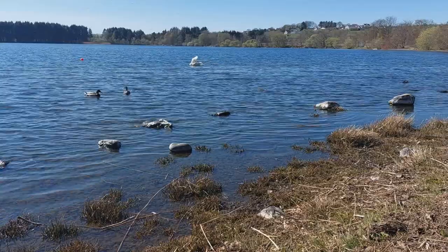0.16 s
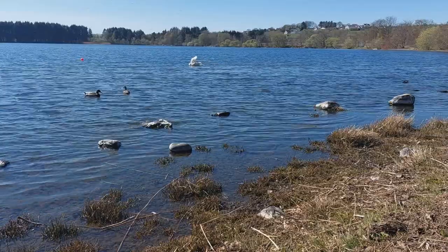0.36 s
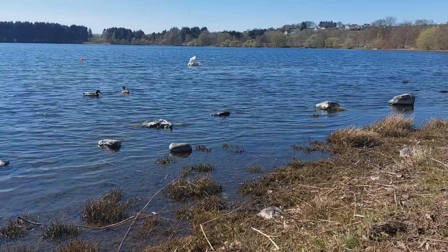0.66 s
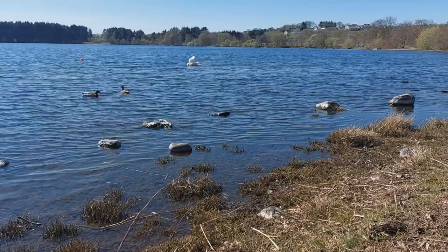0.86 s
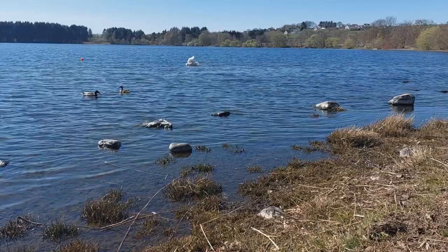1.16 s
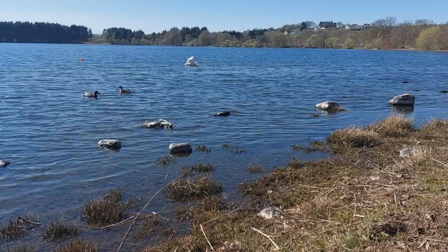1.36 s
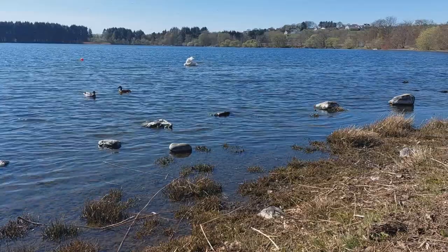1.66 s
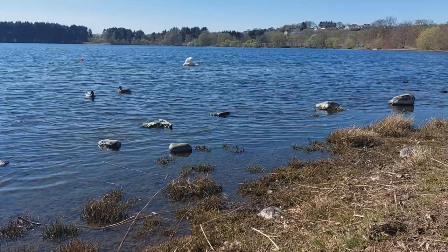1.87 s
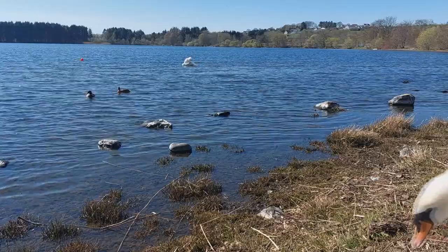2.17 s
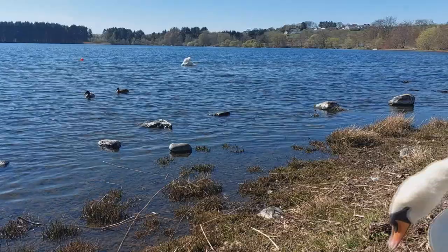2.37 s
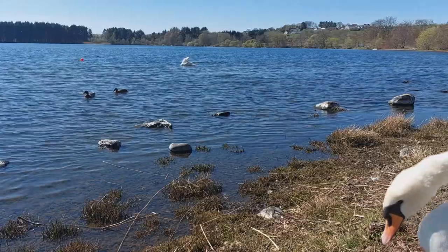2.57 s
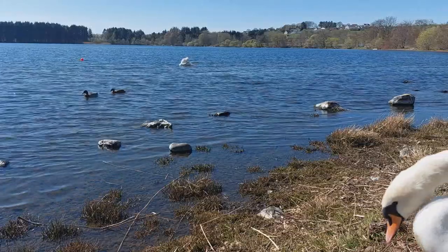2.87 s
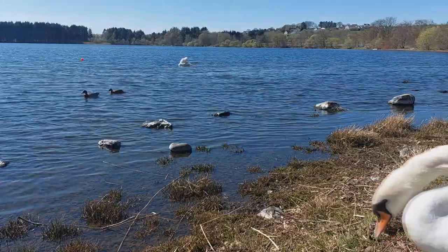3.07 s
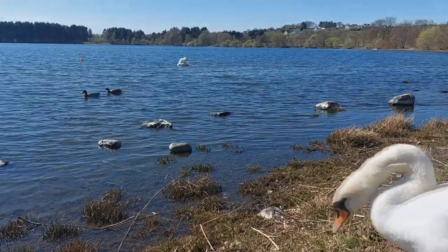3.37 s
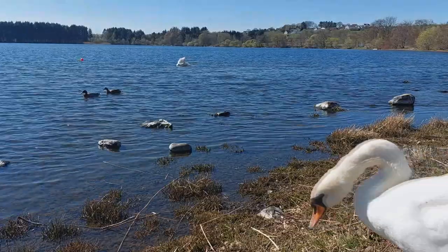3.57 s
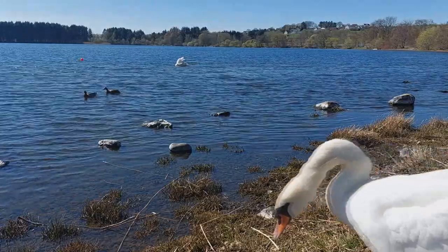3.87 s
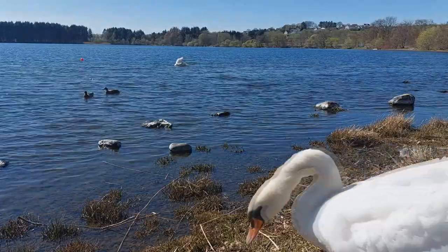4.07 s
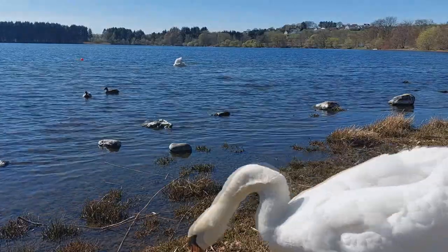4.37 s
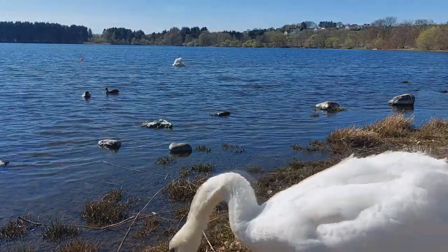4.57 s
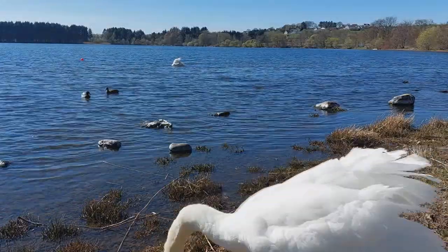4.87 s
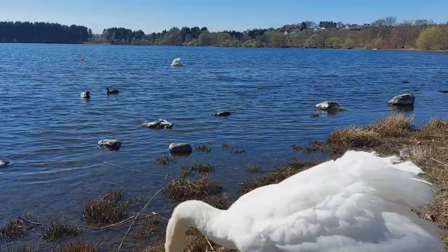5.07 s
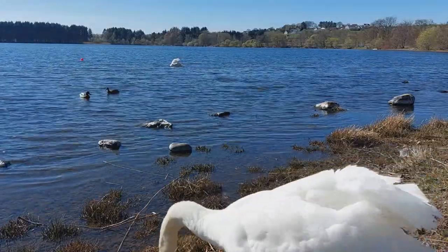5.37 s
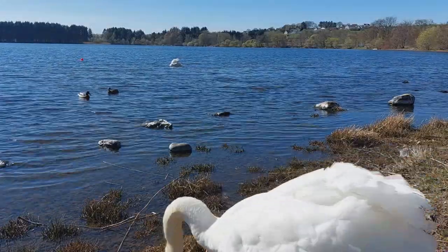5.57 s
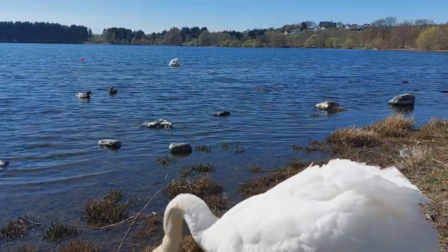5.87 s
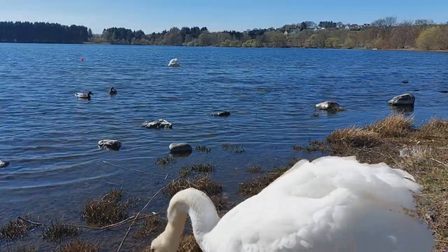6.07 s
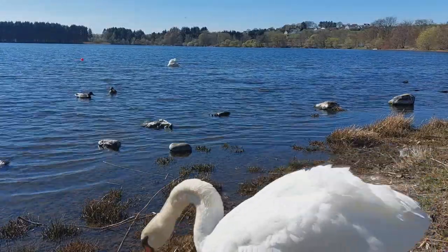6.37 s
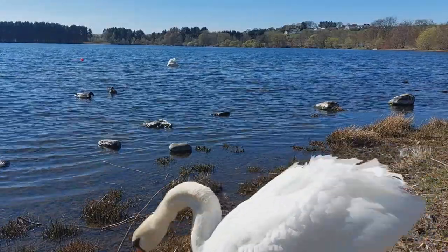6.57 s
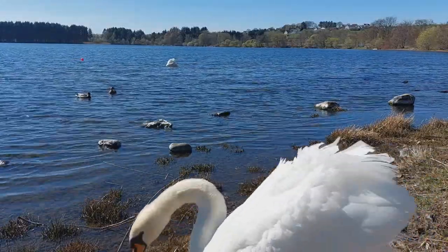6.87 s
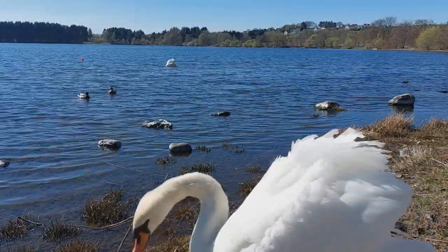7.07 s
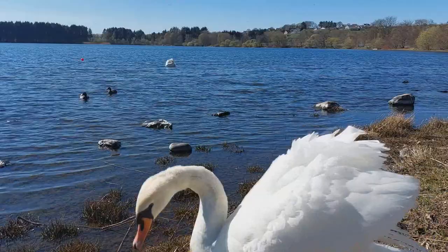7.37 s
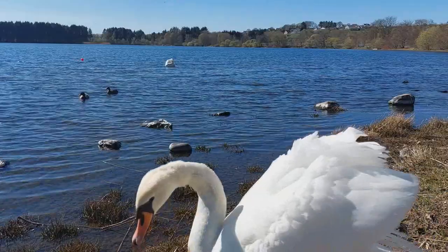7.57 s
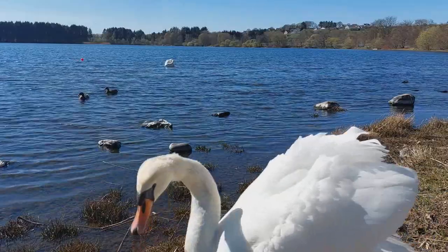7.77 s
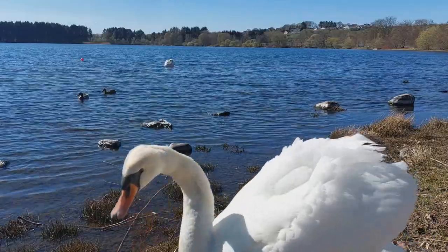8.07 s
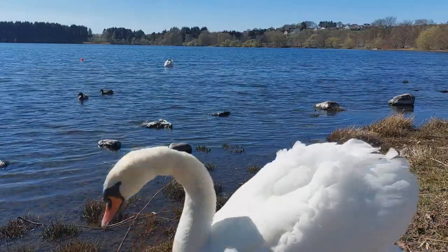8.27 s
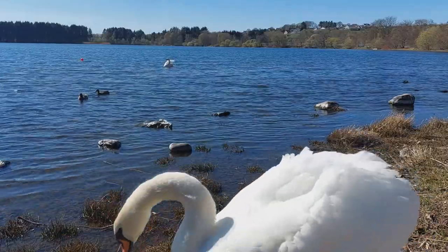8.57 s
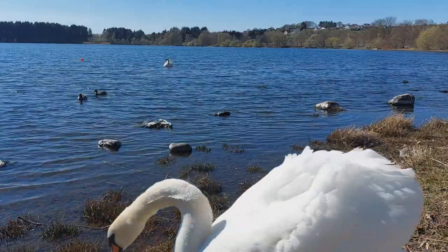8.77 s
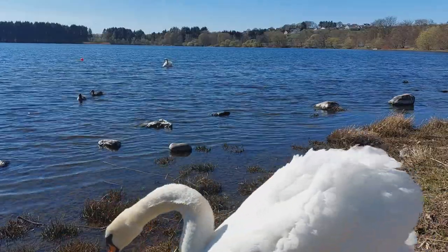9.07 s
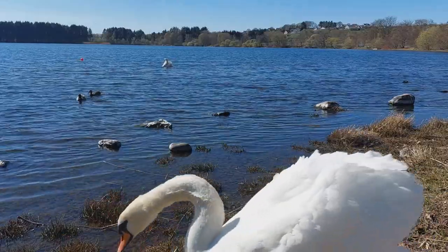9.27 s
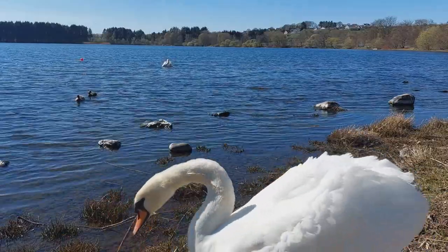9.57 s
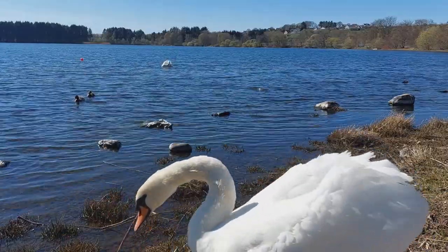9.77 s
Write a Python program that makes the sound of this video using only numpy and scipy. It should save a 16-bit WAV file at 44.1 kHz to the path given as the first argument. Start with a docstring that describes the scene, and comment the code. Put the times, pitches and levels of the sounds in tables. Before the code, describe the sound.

A breezy lakeshore in stereo, about ten seconds. A faint wash of water lies under everything. Low, bassy wind rumbles on the microphone, surging around 1.5 s and from 2.9 to 3.8 s, with lumpy buffets near 5 to 5.5 s; it almost vanishes by 7 s, then weakly returns. Gulls yelp repeatedly from 0.6 to 4.5 s, short arched cries with cracking pitch, slightly left, echoing thinly, with faint distant birds behind. Close dry grass hisses and crackles, first to the right, then nearer the centre, with sharp stalk snaps around 1.4, 4.2, 5.4, 7.7 and 8 s. Calls thin out around 5 to 6 s; soft bill taps and nibbling follow at 6.6 to 7.7 s. A rising honk and raspy cry come at 7.4 s, lower cries until 8 s, then a long, bright descending mew from 8.4 to 9.1 s, a short one at 9.4 s, and another from 9.7 s to the end.

```python
"""Gulls and a grazing swan by a breezy lake

Gulls yelp, honk, rasp, give low cries and mew: harmonics of a gliding pitch pass fixed throat resonances.
A swan walks in from the right and grazes: hiss and crackles for dry grass, noise bursts for snaps and taps.
Wind rumbles on two microphone ports, drops away and later partly returns; eddies buffet the ports.
Shaped noise makes the faint wash of the lake."""
import sys
import numpy as np
from scipy import signal
from scipy.fft import rfft, irfft, next_fast_len
from scipy.io import wavfile
from scipy.ndimage import uniform_filter1d, map_coordinates

SR = 44100
rng = np.random.default_rng(int(sys.argv[2]) if len(sys.argv) > 2 else 0)


def master_out(mix):
    """Clip the mix to full scale and print it as 16-bit PCM to the path in sys.argv[1]."""
    frames = np.transpose(np.atleast_2d(mix))
    ceiling = np.clip(frames, -1, 1)
    pcm = np.round(ceiling * 32767).astype(np.int16)
    wavfile.write(sys.argv[1], SR, pcm)


N = 437913


def amp(db):
    """Decibels to gain."""
    return 10 ** (np.asarray(db) / 20)


def unit(x):
    """Scaled to rms 1."""
    return x / np.sqrt(np.mean(x ** 2) + 1e-20)


def along(points, hz):
    """(f/Hz, value) points interpolated on a log frequency axis."""
    f, v = np.transpose(points)
    return np.interp(np.log(hz + 1), np.log(f + 1), v)


def curve(rows, axis=1):
    """One column of (t/s, value, ..) rows, one value per sample."""
    columns = np.transpose(rows)
    return np.interp(np.arange(N) / SR, columns[0], columns[axis])


def wobble(rate_hz, size=N):
    """Smooth random curve, rate_hz knots a second."""
    knots = rng.standard_normal(int(size * rate_hz / SR) + 4)
    return map_coordinates(knots, [np.arange(size) * rate_hz / SR], mode="nearest")


def filtered(x, response):
    """x times a complex response of frequency."""
    size = x.shape[-1]
    m = next_fast_len(size + 8192)
    return irfft(rfft(x, m) * response(np.fft.rfftfreq(m, 1 / SR)), m)[..., :size]


def coloured(x, spectrum):
    """x shaped by a (f/Hz, level/dB) spectrum, at rms 1."""
    return unit(filtered(x, lambda hz: amp(along(spectrum, hz))))


def add(track, s, sound):
    """Mix a sound into a track at s seconds."""
    start = max(round(s * SR), 0)
    part = track[..., start:start + sound.shape[-1]]
    part += sound[..., :part.shape[-1]]


def panned(x, pan_db):
    """Share the power of x between left and right; pan_db is left minus right."""
    ratio = amp(pan_db)
    return x * np.sqrt(2 / (1 + ratio ** 2)) * np.array([ratio, np.ones_like(ratio)]).reshape(2, -1)


# water spectrum: f/Hz, relative level/dB
LAKE = [(40, 13.5), (400, 3), (800, -8), (1300, -7), (2500, -8.5), (5000, -45), (16000, -47)]


def lake(level_db):
    """Ripples and far air make a faint wash, gently swelling."""
    swell = amp(1.3 * wobble(4))
    return coloured(rng.standard_normal((2, N)), LAKE) * amp(level_db) * swell


# breeze on the ports, before gain: t/s, level/dB
BREEZE = [(0, -36), (.15, -42.5), (.78, -44.5), (1.02, -36), (1.5, -27.5), (1.8, -32.5), (2.1, -40.5),
          (2.7, -42), (2.86, -30), (3.8, -34.5), (4.3, -39.5), (4.95, -38), (5.25, -44), (5.75, -47.5),
          (6.1, -54.5), (6.9, -61.5), (8.5, -49.5), (9.93, -52)]
# short gusts, before gain: t/s, length/s, level/dB
GUSTS = [(0.568, 0.14, -33), (1.86, 0.19, -38), (2.086, 0.24, -36), (2.44, 0.18, -36.5),
         (3.44, 0.15, -33.5), (3.827, 0.21, -31), (5.833, 0.17, -37), (6.958, 0.36, -47.5)]


def wind_strength_db():
    """The powers of the breeze and of swelling, fading gusts add up."""
    power = amp(curve(BREEZE)) ** 2
    for s, length_s, db in GUSTS:
        add(power, s, (amp(db) * signal.windows.hann(round(length_s * SR))) ** 2)
    return 10 * np.log10(power)


# turbulence spectrum: f/Hz, relative level/dB
RUMBLE = [(12, -40), (20, -21), (59, 3.5), (114, 0.5), (183, -9), (250, -11.5), (305, -22), (369, -29.5),
          (549, -41.5), (1170, -46.5), (1980, -120)]


def wind(gain_db, lumps_db, bright_db, bright_db_per_db):
    """Each port has its own turbulence; stronger wind sheds smaller eddies and sounds brighter."""
    level_db = wind_strength_db()
    lumps = amp(lumps_db * np.array([wobble(35), wobble(35)]))
    rumble = coloured(rng.standard_normal((2, N)), RUMBLE)
    low = filtered(rumble, lambda hz: 1 / (1 + (hz / 170) ** 4))
    below_peak_db = np.maximum(level_db - level_db.max(), -9)
    brightness = amp(bright_db + bright_db_per_db * below_peak_db)
    return amp(level_db + gain_db) * unit(lumps) * (low + brightness * (rumble - low))


# single eddies, before gain: t/s, core length/s, centre f/Hz, left level/dB, right level/dB
BUFFETS = [(4.753, 0.021, 119, -26, -37), (4.839, 0.047, 180.8, -45, -17.5),
           (4.932, 0.069, 110, -27, -24.5), (5.024, 0.019, 120, -31, -13), (5.044, 0.028, 199, -48, -22),
           (5.25, 0.015, 88, -29.5, -30), (5.348, 0.089, 100.7, -31, -40), (5.434, 0.0235, 238, -25, -13),
           (5.448, 0.0115, 325, -43, -21), (5.471, 0.0495, 177, -25.5, -25), (7.583, 0.083, 109, -36, -44),
           (8.084, 0.044, 143.5, -27, -30.5), (9.183, 0.02, 112, -33.5, -28.5),
           (9.276, 0.025, 133, -26.5, -21.5), (9.303, 0.068, 129, -26, -32)]


def buffets(gain_db, steepness, reach, core_db):
    """An eddy hits a port: a few cycles of pressure at its own frequency, wrapped in smaller swirls."""
    out = np.zeros((2, N))
    for s, length_s, centre_hz, *port_db in BUFFETS:
        size = round(1.38 * length_s * SR)  # the eddy swells and fades beyond its core
        swell = signal.windows.tukey(size, .5)

        def swirl_response(hz):
            ratio = hz / centre_hz
            return ratio ** 0.75 / (1 + (ratio / reach) ** steepness)

        for port, db in zip(out, port_db):
            hz = centre_hz * np.exp(0.177 * wobble(106.6, size))
            cycles = rng.random() + np.cumsum(hz) / SR
            core = np.pad(swell * np.sin(2 * np.pi * cycles), size)
            push = np.pad(swell * rng.standard_normal(size), size)
            swirls = filtered(push, swirl_response)
            eddy = unit(unit(swirls) + amp(core_db) * unit(core))
            add(port, s - 0.1577 * length_s - size / SR, amp(db + gain_db) * eddy)
    return out


# steady stirring of dry grass, before gain: t/s, level/dB
STIR = [(0.0, -51.5), (0.25, -68), (0.7, -57.5), (1.6, -59), (2.4, -62), (3.0, -67), (3.6, -63.5),
        (4.3, -59), (5.5, -53.5), (6.25, -64), (6.7, -54), (6.9, -61.5), (7.3, -61.5), (7.9, -56.5),
        (8.4, -51), (9.2, -55.5), (9.93, -67.5)]
# foot or bill sweeping through grass, before gain: t/s, length/s, level/dB
SWEEPS = [(0, 0.094, -52), (0.318, 0.097, -45.5), (0.417, 0.2, -55.5), (1.203, 0.38, -54.5),
          (1.734, 0.08, -46.5), (2, 0.057, -50), (3.138, 0.088, -56), (3.688, 0.046, -49),
          (3.935, 0.078, -48.5), (4.477, 0.51, -54), (4.97, 0.066, -48), (5.079, 0.13, -47.5),
          (5.32, 0.082, -51), (5.515, 0.091, -53), (6.975, 0.22, -52), (7.382, 0.19, -52),
          (8.092, 0.2, -47), (8.484, 0.066, -46), (8.754, 0.064, -52), (9.312, 0.18, -55.5)]
SWEEP_ATTACK_S, SWEEP_RELEASE_S = 0.045, 0.043


def rustle_strength_db():
    """Each sweep rises, holds and dies away; its power adds to the steady stirring."""
    power, t = amp(curve(STIR)) ** 2, np.arange(SR) / SR
    for s, length_s, db in SWEEPS:
        rise = np.minimum(t / SWEEP_ATTACK_S, 1)
        shape = rise * np.exp(-np.maximum(t - length_s, 0) / SWEEP_RELEASE_S)
        add(power, s, (amp(db) * shape) ** 2)
    return 10 * np.log10(power)


# blade spectrum: f/Hz, relative level/dB
GRASS = [(500, -3.5), (1200, -2), (2500, -3), (4500, -2), (7500, -2), (10000, -4), (12000, 3), (14000, 0.5),
         (16000, -2.5)]
# where the swan treads: t/s, left minus right level/dB, crispness of the stalks/dB
SWAN = [(0, -9, 5.5), (1.8, -7, 5), (3.05, -1.5, 5.5), (3.8, -4, 6), (4.7, 2.5, 3), (5, 1.5, 0.5),
        (6, 2, -1.5), (9.9, 1, -6.5)]


def grass(gain_db, crackle_db, grain_spread_db, flicker_db, shared):
    """Dry blades brush past each other: a hiss with small crackles, moving with the swan."""
    hiss = rng.standard_normal((3, N))
    cracks_per_s, grain_decay_s = 900, 0.00032
    sizes = amp(grain_spread_db * np.minimum(rng.exponential(size=N), 5))
    cracks = (rng.random(N) < cracks_per_s / SR) * sizes
    decays = signal.lfilter([1], [1, -np.exp(-1 / (grain_decay_s * SR))], cracks)
    grains = decays * rng.standard_normal((3, N))
    crisp = amp(curve(SWAN, axis=2))  # crisp stalks crackle more and sizzle higher
    left, right, both = unit(hiss + amp(crackle_db) * crisp * unit(grains))
    pair = coloured(np.array([left, right]) + shared * both, GRASS)
    sizzle = filtered(pair, lambda hz: 1 - 1 / (1 + (hz / 10000) ** 8))
    level = amp(rustle_strength_db() + gain_db + flicker_db * wobble(45))
    return panned((pair + (crisp - 1) * sizzle) * level, curve(SWAN))


def clicks(events, spectrum, t60_s, gain_db):
    """Short bursts with no ring, from where the swan stands; crisper ground makes them louder."""
    out, t = np.zeros((2, N)), np.arange(SR // 30) / SR
    for s, db in events:
        noise = rng.standard_normal(len(t)) + 1.17 * rng.standard_normal((2, len(t)))
        # 2 ms of lead-in leaves room for the zero-phase filter
        padded = np.pad(noise * amp(-60 * t / t60_s), ((0, 0), (SR // 500, 0)))
        burst = coloured(padded, spectrum)
        add(out, s - 1 / 500, amp(db + gain_db) * burst / np.abs(burst).max())
    return panned(out * amp(curve(SWAN, axis=2)), curve(SWAN))


# snapping stalks, before gain and crispness: t/s, level/dB
SNAPS = [(.5043, -36.5), (1.3774, -30.5), (1.5254, -34), (1.7187, -32), (3.3775, -35), (4.154, -34.5),
         (4.1854, -37), (4.2178, -36), (5.4287, -28), (6.1005, -46), (7.6869, -28.5), (7.96, -28.5),
         (9.6599, -31)]


def snaps():
    """Dry stalks break with bright bursts."""
    spectrum = [(500, -21), (2000, -9), (8000, 4.0), (13000, 14.0)]  # f/Hz, level/dB
    return clicks(SNAPS, spectrum, t60_s=0.0086, gain_db=3.5)


def nibbles(start_s, end_s, level_db, count):
    """The bill chatters through wet grit: a quick run of faint taps at random moments."""
    draws = rng.random((count, 2))
    return [(start_s + when * (end_s - start_s), level_db + 10 * loud) for when, loud in draws]


# taps of the grazing bill, before gain and crispness: t/s, level/dB
TAPS = [(6.595, -53), (6.622, -50), (6.683, -48.5), (6.864, -50.5), (7.687, -43)]


def taps():
    """The bill taps and nibbles with dull bursts."""
    spectrum = [(150, -28), (600, -0.5), (1100, 3.0), (2000, -23), (5000, -17.5)]  # f/Hz, level/dB
    events = TAPS + nibbles(6.58, 7.7, level_db=-74.0, count=44)
    return clicks(events, spectrum, t60_s=0.0078, gain_db=17.5)


# echo decay: f/Hz, t60/s
SHORE = [(300, 0.13), (2300, 0.6), (9000, 0.16)]


def shore(x):
    """A thin diffuse echo comes off the water and the banks."""
    hz, t, z = signal.stft(rng.standard_normal((2, SR // 2)), SR, nperseg=256)
    decay = amp(-60 * t / along(SHORE, hz)[:, None])
    tail = signal.istft(z * decay, SR, nperseg=256)[1]
    return signal.fftconvolve(x[None], tail / np.linalg.norm(tail[0]), axes=1)[:, :N]


# any gull call sounding in this span turns raspy: t/s, pitch scatter/share of the pitch
RASP = [(7.41, 0.027), (7.5, 0.11), (7.6, 0.24)]
BLOOM_S = 0.043  # build-up time of overtones, where bloom_db is set


def gull(calls, throat, jitter, flutter_db, lead_ms, pan_db, echo_db, odd_db=0, waver=0, bloom_db=0):
    """Harmonics of a gliding syrinx pass a fixed throat and reach the left port first."""
    voice = np.zeros(N)
    for call, odd in zip(calls, np.broadcast_to(odd_db, len(calls))):
        s, pitch_hz, level_db = np.transpose(call)
        t = np.arange(s[0], s[-1], 1 / SR)
        glide_hz = uniform_filter1d(np.interp(t, s, pitch_hz), size=250)
        hz = glide_hz * (1 + waver * wobble(56.6, len(t)))
        rasp = np.interp(t, *np.transpose(RASP), left=0, right=0)
        scatter = jitter * wobble(398, len(t)) + rasp * wobble(892, len(t))
        phase = 2 * np.pi * np.cumsum(hz * (1 + scatter)) / SR
        muted_db = bloom_db * np.exp((t[0] - t) / BLOOM_S)
        tone = np.zeros(len(t))
        for k in range(1, 12):
            # odd_db sets odd harmonics against even; bloom acts from the third up
            harmonic_db = along(throat, k * hz) + odd * (k % 2) - muted_db * (k > 2)
            tone += amp(harmonic_db) * np.sin(k * phase)
        edges = np.clip(np.minimum(t - t[0], t[-1] - t) / 0.00062, 0, 1)
        level = amp(np.interp(t, s, level_db) + flutter_db * wobble(128.7, len(t)))
        add(voice, s[0], np.sqrt(2) * tone * edges * level)
    half_lead_s = lead_ms / 2000 * np.array([[1], [-1]])
    ports = filtered(voice, lambda hz: np.exp(2j * np.pi * hz * half_lead_s))
    return panned(ports, pan_db) + amp(echo_db) * shore(voice)


SCOOP, FLICK_S = 0.036, 0.0111  # flat start/share of the pitch; time constant of scoop and final drop
FLICK_FADE_DB = 35  # fade per unit share of the pitch as the voice goes flat
YELP_FADE_DB, FADE_POWER = 7, 2.8  # fade towards both ends
THIN_FROM_HZ, THIN_OVER_HZ, THIN_DB = 1216, 133, 10  # the voice thins as it is pushed high


def yelps(rows):
    """Each yelp is one arch of pitch, scooped at the start and dropped at the end."""
    u, calls = np.linspace(0, 1, num=60), []
    for s, length_s, start_hz, top_hz, end_hz, drop, db in rows:
        rise, fall = np.sqrt(np.maximum([top_hz - start_hz, top_hz - end_hz], 0))
        hz = top_hz - ((rise + fall) * u - rise) ** 2
        thinning_db = THIN_DB * np.clip((hz - THIN_FROM_HZ) / THIN_OVER_HZ, 0, 1)
        scooped = SCOOP * np.exp(-u * length_s / FLICK_S)
        dropped = drop * np.exp((u - 1) * length_s / FLICK_S)
        flick = 1 - scooped - dropped
        fade_db = FLICK_FADE_DB * (1 - flick) + YELP_FADE_DB * np.abs(2 * u - 1) ** FADE_POWER
        calls.append(np.transpose([s + length_s * u, hz * flick, db - thinning_db - fade_db]))
    return calls


# how busy the distant flock is: t/s, level/dB
FAR_FLOCK = [(0, 9.5), (3.8, -1.5), (5, 9.5), (6.1, -19), (7.1, -16), (8.5, 10), (9.9, 4.5)]


def far_calls(count, top_hz, level_db):
    """Birds far across the lake give short arches of pitch at random moments."""
    calls = []
    for slot, (when, long, high, loud) in enumerate(rng.random((count, 4))):
        start_s = (slot + when) / count * N / SR
        s = start_s + np.linspace(0, 0.0597 + 0.1056 * long, num=5)
        arch = np.sin(np.linspace(0, np.pi, num=5))
        hz = top_hz * (.72 + 0.34 * high) * (.8 + .2 * arch)
        flock_db = np.interp(s, *np.transpose(FAR_FLOCK))
        calls.append(np.transpose([s, hz, level_db + flock_db + 5 * loud + 9 * (arch - 1)]))
    return calls


# single far calls: t/s, length/s, start f/Hz, top f/Hz, end f/Hz, final drop/share of the pitch, level/dB
FAR_CRIES = [(.52, 0.29, 1460, 1500, 1130, 0.023, -61), (8.6, 0.42, 1378, 1341, 1300, 0, -50)]


def far_gulls():
    """Distance takes away the overtones of far calls and cries."""
    dulled = [(1600, 0.0), (2600, -13.0), (6000, -65)]  # f/Hz, level/dB
    calls = far_calls(count=64, top_hz=1646, level_db=-69) + yelps(FAR_CRIES)
    return gull(calls, dulled, jitter=0.011, flutter_db=3.0, lead_ms=0.37, pan_db=1.0,
                echo_db=-7.0, waver=0.0047)


# air torn by the rasping voice: t/s, level/dB
HOARSE = [(7.415, -94), (7.43, -55), (7.47, -51), (7.5, -60), (7.53, -78), (7.59, -74), (7.62, -90)]
# its resonances: f/Hz, relative level/dB
HOARSE_THROAT = [(500, -24), (1200, -9), (1800, -11), (2100, -1), (2950, 3), (3200, -32), (4800, -22),
                 (7000, -30)]


def hoarse(pulse_hz, flutter_db, lead_ms):
    """The rasping cry tears into puffs of noise, one for each ragged cycle of the syrinx."""
    cycles = np.cumsum(pulse_hz * (1 + 0.06 * wobble(320))) / SR
    pulsed = rng.standard_normal(N) * (1 + np.sin(2 * np.pi * cycles))
    puffs = coloured(pulsed, HOARSE_THROAT)
    voice = puffs * amp(curve(HOARSE) + flutter_db * wobble(140))
    ports = np.array([voice, np.roll(voice, round(lead_ms * SR / 1000))])
    return ports + amp(-24) * shore(voice)


# rising honks: t/s, length/s, start f/Hz, end f/Hz, level/dB
HONKS = [(4.446, 0.025, 734, 835, -57), (5.663, .062, 790, 895, -56.5), (7.344, 0.062, 689, 885, -50)]


def honks(swell_db):
    """A honk climbs steadily in pitch, swells and breaks off."""
    u, calls = np.linspace(0, 1, num=30), []
    for s, length_s, start_hz, end_hz, db in HONKS:
        hz = start_hz + (end_hz - start_hz) * u
        calls.append(np.transpose([s + length_s * u, hz, db - swell_db * (1 - u) ** 2]))
    return calls


# honker's resonances: f/Hz, relative level/dB
HONK_THROAT = [(1000, -20), (1500, -1.5), (1750, -3.5), (2100, -27), (2600, -12), (3300, -9.5), (4100, -19),
               (4600, -5), (6000, -31)]


def honker():
    """Rising honks pass the throat of a bird almost straight ahead."""
    return gull(honks(swell_db=14), HONK_THROAT, jitter=0.0073, flutter_db=2.0, lead_ms=0.086,
                pan_db=0.0, echo_db=-5, waver=0.0082)


# low cries: t/s, length/s, start f/Hz, top f/Hz, end f/Hz, final drop/share of the pitch, level/dB
LOW_CRIES = [(4.61, .13, 797, 948, 945, 0.014, -59.5), (5.72, 0.063, 1103, 1132, 960, 0.036, -52),
             (6.355, .11, 963, 1087, 898, .07, -53), (7.43, 0.11, 950, 1006, 845, 0.1, -54.5),
             (7.52, .07, 753, 749, 576, .09, -63.5), (7.7, .145, 933, 1070, 910, 0.047, -52),
             (8.008, 0.08, 1036, 1185, 1227, 0.012, -47)]
# low crier's resonances: f/Hz, relative level/dB
LOW_THROAT = [(750, 7), (950, -0.5), (1150, -2.5), (1650, 5.5), (2200, 0.5), (3200, -21), (4300, -21),
              (7000, -42), (15000, -57)]


def low_crier():
    """Lower arches of pitch pass a throat of their own."""
    return gull(yelps(LOW_CRIES), LOW_THROAT, jitter=0.012, flutter_db=1.0, lead_ms=0.31,
                pan_db=1.0, echo_db=-14.5, waver=0.0072)


# long mews: t/s, end t/s, pitch f/Hz, overshoot at the start/Hz, settling time/s, glide/(Hz/s),
# start level/dB, middle level/dB, end level/dB, odd harmonics/dB
MEWS = [(8.086, 8.417, 1636, -105, 0.064, 113, -42, -49.5, -64, -22),
        (8.393, 9.094, 1533, 139.5, 0.081, -185, -41.5, -32, -36.5, -1.5),
        (9.369, 9.469, 1328, 90, 0.027, 2600, -34, -33.5, -52, -14),
        (9.69, 9.96, 1377, 171, 0.028, -215, -30, -31, -31.5, -2.5)]
MEW_DROP_HZ = 50  # the pitch sinks as a mew closes
MEW_ATTACK_S, MEW_RELEASE_S, MEW_FADE_DB = 0.02, 0.036, 19


def mews():
    """A mew starts off its note, then settles quickly, glides steadily and sinks as it closes."""
    calls = []
    for s, end_s, pitch_hz, overshoot_hz, settle_s, glide_hz_per_s, *levels_db, _ in MEWS:
        length_s = end_s - s
        t = np.linspace(0, length_s, num=150)
        opening = np.minimum(t / MEW_ATTACK_S, 1)
        closing = np.minimum((length_s - t) / MEW_RELEASE_S, 1)
        settling_hz = overshoot_hz * np.exp(-t / settle_s)
        hz = pitch_hz + settling_hz + glide_hz_per_s * t - MEW_DROP_HZ * (1 - closing)
        db = np.interp(t, [0, length_s / 2, length_s], levels_db)
        calls.append(np.transpose([s + t, hz, db + MEW_FADE_DB * (opening * closing - 1)]))
    return calls


# mewer's resonances: f/Hz, relative level/dB
MEW_THROAT = [(1350, -23.5), (1600, -22), (2500, -6.5), (3300, -6.5), (4000, -27.5), (4500, -33),
              (5300, -24), (5800, -22), (6800, -35), (8200, -31.5), (11500, -42), (14300, -33),
              (16000, -44)]


def mewer():
    """The mew sounds at twice the written pitch; the voice at times splits to half that note, adding weaker odd
    partials; higher overtones build up after the start."""
    return gull(mews(), MEW_THROAT, jitter=0.0039, flutter_db=0.75, lead_ms=0.318, pan_db=3.0,
                echo_db=-17.5, odd_db=[mew[-1] for mew in MEWS], bloom_db=23)


# arched yelps: t/s, length/s, start f/Hz, top f/Hz, end f/Hz, final drop/share of the pitch, level/dB
YELPS = [(1.54, 0.37, 1596, 1611, 1443, 0.015, -48), (1.56, 0.081, 1055, 1060, 1020, 0.11, -58),
         (1.905, 0.19, 1115, 1127, 1092, 0.0094, -59.5), (2.195, .32, 1300, 1514, 1263, 0, -50.5),
         (2.42, 0.16, 1151, 1170, 1130, 0, -61.5), (2.49, 0.079, 1290, 1258, 1178, .03, -50),
         (3.385, 0.15, 1048, 1150, 1018, 0.026, -55), (3.535, 0.06, 1050, 1131, 1000, 0.14, -60.5),
         (3.7, 0.12, 1148, 1152, 1137, 0.11, -56), (3.745, .06, 1032, 1118, 1129, 0, -57),
         (4.02, 0.057, 1153, 1153, 1140, 0.096, -58.5), (4.432, 0.041, 1010, 1190, 1190, 0.016, -63.5),
         (4.478, 0.089, 1280, 1300, 1080, 0.077, -60.5), (6.455, 0.062, 963, 1153, 1050, 0.082, -64),
         (6.53, 0.081, 1254, 1315, 1286, 0.063, -58), (7.882, .037, 1265, 1280, 1224, .05, -60.5),
         (8.66, .2, 1173, 1125, 960, .05, -66), (8.8, 0.14, 1107, 1156, 1080, .09, -64),
         (9.0, 0.12, 915, 1065, 893, .18, -61.5), (9.195, 0.25, 1035, 1224, 1240, 0.02, -72.5),
         (9.455, 0.14, 1062, 1320, 1095, .04, -62), (9.615, 0.28, 1135, 1125, 910, 0.051, -65)]
# pitch tracks of cracked yelps, a yelp's rising onset and a honk's falling tail, one list each:
# t/s, pitch f/Hz, level/dB
PITCH_TRACKS = [
    [(.62, 802, -62), (.645, 810, -66), (.669, 910, -60), (.672, 1133, -58), (.705, 1225, -62),
     (.76, 1245, -72), (.82, 684, -78)],
    [(.85, 1115, -66), (.885, 1122, -61.5), (.96, 1298, -64), (1.01, 1327, -68), (1.06, 1186, -57.5),
     (1.17, 1148, -56), (1.185, 1022, -67), (1.215, 910, -81)],
    [(1.39, 990, -62.5), (1.425, 1073, -56), (1.445, 1220, -59), (1.48, 1324, -66), (1.515, 1245, -58.5),
     (1.565, 1096, -61), (1.58, 1107, -58), (1.595, 1280, -55)],
    [(2.705, 995, -72), (2.75, 1070, -59.5), (2.756, 1210, -57), (2.8, 1337, -71), (2.865, 1263, -57.5),
     (2.911, 1210, -54), (2.916, 1030, -62), (2.93, 1000, -67)],
    [(3.06, 1017, -65.5), (3.09, 1090, -58), (3.122, 1124, -63), (3.128, 1226, -56), (3.213, 1238, -56),
     (3.219, 1010, -59), (3.25, 890, -71)],
    [(4.465, 1030, -63), (4.472, 1135, -55), (4.48, 1280, -61)],
    [(7.405, 898, -64), (7.432, 806, -70), (7.445, 760, -66)],
]
# yelpers' resonances: f/Hz, relative level/dB
YELP_THROAT = [(800, 12), (1100, 13.5), (1350, -12), (1650, 10), (2000, 10), (3000, -4.5), (3500, 1),
               (4400, -25), (8000, -31), (15000, -54)]


def yelping_flock():
    """Arched yelps and free pitch tracks share one throat; the syrinx favours its even harmonics."""
    return gull(yelps(YELPS) + PITCH_TRACKS, YELP_THROAT, jitter=0.0071, flutter_db=0.6, lead_ms=0.436,
                pan_db=3.0, echo_db=-9.5, odd_db=-13.5, waver=0.0044)


def scene():
    """Gulls mostly on the left, the swan close by, wind and water all round."""
    air = wind(gain_db=4.0, lumps_db=4.0, bright_db=1.5, bright_db_per_db=0.51)
    air += buffets(gain_db=-5.0, steepness=4.98, reach=1.27, core_db=-10.0)
    swan = grass(gain_db=0.5, crackle_db=-6.5, grain_spread_db=3.5, flicker_db=2.0, shared=0.17)
    swan += snaps() + taps()
    gulls = far_gulls() + hoarse(pulse_hz=944, flutter_db=-4.0, lead_ms=0.29)
    gulls += honker() + low_crier() + mewer() + yelping_flock()
    return lake(level_db=-58.5) + air + swan + gulls


TOP_HZ = 15950


def record(dry):
    """The band limit cuts everything from TOP_HZ up."""
    return filtered(dry, lambda hz: hz < TOP_HZ)


dry = scene()
out = record(dry)
master_out(out)
```